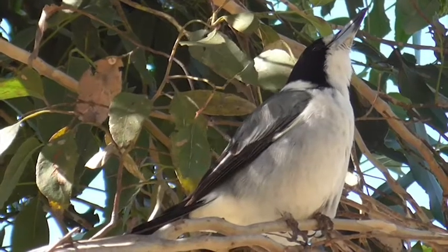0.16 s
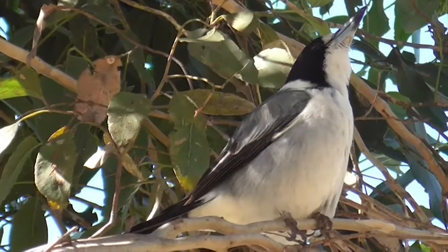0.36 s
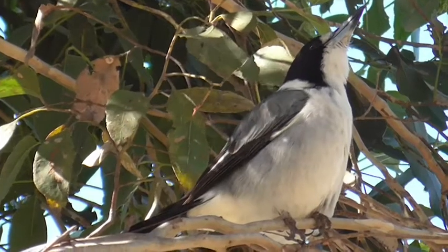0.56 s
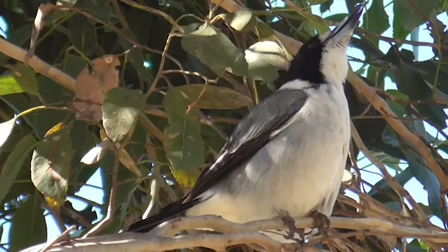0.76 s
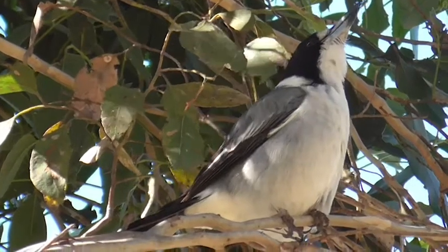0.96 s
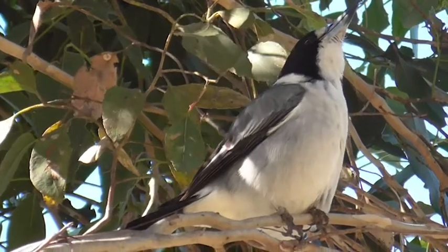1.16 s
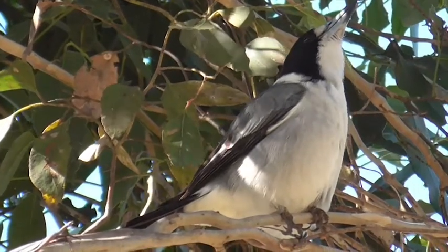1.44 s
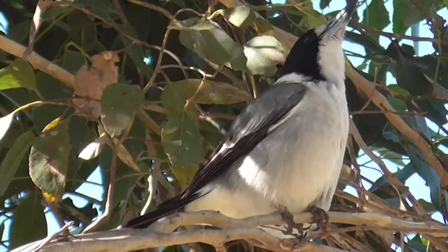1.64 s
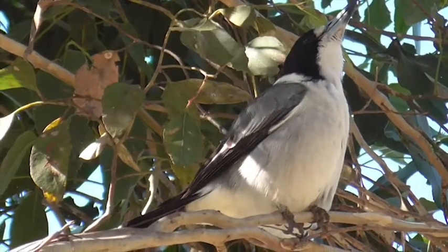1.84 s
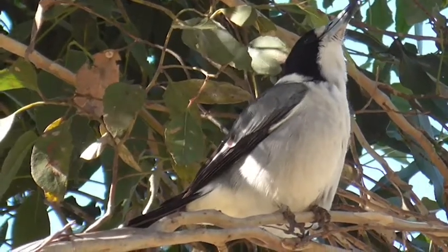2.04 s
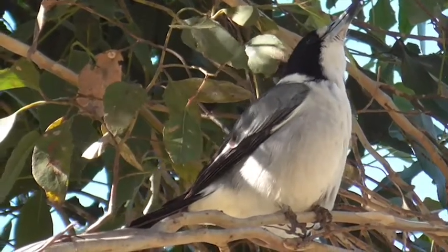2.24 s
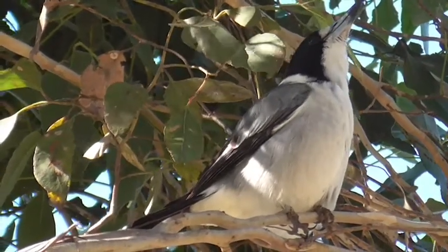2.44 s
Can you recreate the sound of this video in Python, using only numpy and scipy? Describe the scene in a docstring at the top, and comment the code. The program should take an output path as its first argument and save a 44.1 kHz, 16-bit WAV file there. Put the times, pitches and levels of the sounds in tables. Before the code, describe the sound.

A butcherbird sings softly among trees: a low falling whistle at 0 s, sharp rising chirps at 0.75 and 1.1 s, then short mellow whistles from 1.33 to 1.77, a downward glide at 2.05 and quick notes near 2.5. Distant raspy upslurs come at 0.4 and 2.15, thin chips between. A faint tick at 0.86, soft pop at 1.13, loud hollow knock at 1.8. Steady hiss, short echo.

```python
"""Among trees outdoors, a butcherbird sings softly: low whistled notes and two sharp rising chirps.
Its notes are gliding tones with overtones, their pitch and strength fluttering.
Birds farther off give raspy upslurs and thin chips made the same way, with scratchy swells of noise.
Knocks, one faint and one loud, mix decaying noise with ringing modes; a soft pop is a noise swell.
Coloured noise hisses steadily under it all, and the trees scatter a short echo around the calls."""
import sys
import numpy as np
from scipy import signal
from scipy.fft import rfft, irfft
from scipy.io import wavfile
from scipy.ndimage import uniform_filter1d

SR = 44100
rng = np.random.default_rng(int(sys.argv[2]) if len(sys.argv) > 2 else 0)


def file_out(sig):
    """Save sig as 16-bit WAV at sys.argv[1]."""
    # one column per channel
    cols = np.atleast_2d(sig).T
    # limit, then scale
    lim = np.clip(cols, -1, 1)
    pcm = np.round(lim * 32767).astype(np.int16)
    wavfile.write(sys.argv[1], SR, pcm)


N = 113778  # length in samples

# Colour of the outdoor hiss. Each row: frequency in Hz, relative density in dB per Hz.
HISS_COLOUR = [(15, -55), (28, -26), (50, -21.5), (80, -9), (148, -5.5), (275, -5), (434, -3.5),
               (510, -3.5), (650, -1.5), (829, 0), (1180, -3.5), (1540, -11.5), (1800, -18), (2130, -16.5),
               (2940, -12.5), (3270, -8), (4280, -5), (5760, -9.5), (8170, -6), (10700, -11.5),
               (12200, -12.5), (12900, -12.5), (13800, -15.5), (15600, -18.5)]
# Stereo tilt of the hiss. Each row: frequency in Hz, left minus right in dB.
HISS_BALANCE = [(100, 0.5), (900, -2.1), (1600, -3.5), (2500, -1), (4600, -0.5), (6000, 0.5), (8500, 2),
                (10500, 1.5), (12500, -3.5), (12900, 4), (13600, -2.5)]
# Stereo width of noise. Each row: frequency in Hz, left-right likeness (1 is identical).
LIKENESS = [(30, 0.49), (100, 1), (250, 0.94), (500, 0.65), (950, 0.48), (1900, 0.4), (3800, 0.37),
            (7500, 0.055), (15000, .05)]
# Echo among the trees. Each row: frequency in Hz, 60 dB decay time in seconds.
ECHO_T60 = [(200, 0.27), (1000, 0.48), (3000, 0.29), (6000, 1), (12000, .2)]

# Knocks. Each row: start in seconds, crack level in dB, thump level in dB, share of the full decay time.
KNOCKS = [(.862, -41, -70, .15), (1.789, -24, -36, 1)]
# Colours of crack, its tail and the thump. Each row: frequency in Hz, relative density in dB per Hz.
CRACK_COLOUR = [(470, -22), (800, -4), (2000, -17), (3100, 0), (4900, 3.5), (5900, -12), (6800, 2),
                (8200, -8), (10000, 0), (13900, -10), (15000, -25)]
CRACK_TAIL_COLOUR = [(470, -12), (1200, 2.5), (2000, -8), (3100, -0.5), (4800, 0), (7000, -3), (10000, -5),
                     (13000, -12), (15000, -31)]
THUMP_COLOUR = [(40, -35), (90, -30), (190, 4), (290, 1), (410, 4.5), (560, 4.5), (900, -3.5), (1500, -13),
                (4000, -40)]
# Hollow ringing in the thump. Each row: frequency in Hz, relative level in dB, full 60 dB decay in seconds.
KNOCK_MODES = [(100.6, -13, 0.4), (229.4, -5, 0.44), (295, -5, 0.63), (440, 4, 0.22), (748, -3.5, 0.41)]

# Soft pop under the second chirp. Each row: start in seconds, length in seconds, centre in Hz,
# width in Hz, level in dB before the swell and echo.
POPS = [(1.134, 0.0101, 600, 447, -35.5)]
# Scratchy noise among the calls. Each row: start in seconds, length in seconds, centre in Hz,
# width in Hz, level in dB before the swell and echo.
RASPS = [(0.35, .075, 9370, 2400, -46.5), (.925, .05, 11000, 1200, -52.5), (1.103, 0.031, 11400, 800, -50),
         (1.109, 0.072, 7400, 3200, -49.5), (1.1, 0.051, 2500, 3000, -46.5),
         (1.615, 0.056, 4300, 1500, -54), (2.147, 0.072, 8000, 970, -50.5),
         (2.433, 0.037, 1380, 250, -48.5), (2.6, 0.031, 1130, 220, -44.5), (.735, .025, 3400, 470, -41.5),
         (.935, 0.053, 5200, 4500, -50)]

# Thin distant chips. Each row: start in seconds, length in seconds, top pitch in Hz,
# top level in dB before the overtone levels.
CHIPS = [(.877, 0.0147, 3806, -41.5), (0.931, 0.0246, 4020, -45), (2.338, 0.017, 4600, -47)]
# Chip levels in dB, one per harmonic.
CHIP_OVERTONES_DB = [-2, -6, -10.5]

# Raspy upslurs, one curve per call. Each row: time in seconds, pitch in Hz,
# level in dB before the overtones and throat.
UPSLURS = [
    [(.365, 2040, -69), (.394, 2260, -47.5), (.408, 2480, -46), (.420, 2794, -43.5), (.436, 3010, -46.5),
     (.450, 3100, -50)],
    [(2.135, 2160, -61), (2.150, 2440, -47), (2.170, 2806, -46), (2.183, 3340, -41.5), (2.190, 3320, -66)],
]
# Upslur levels in dB, one list per call, one value per harmonic.
UPSLUR_OVERTONES_DB = [
    [-9, 0, -8, -6],
    [-3.5, 0, -5, -15],
]
# Throat colour of the upslurs. Each row: frequency in Hz, gain in dB.
UPSLUR_THROAT = [(2200, -4.5), (3300, 1.5), (4200, -2.5), (5500, 1.5), (6500, -8.5), (8000, 0), (9500, -8),
                 (11000, -12), (14000, -12)]
# Faint, wavering distant note. Each row: time in seconds, pitch in Hz, level in dB.
FAR_NOTE = [(.022, 2030, -60), (.05, 2113, -60), (.07, 2150, -67), (.1, 1845, -60)]

# Rising chirps, one curve per note. Each row: time in seconds, pitch in Hz, level in dB.
CHIRPS = [
    [(.714, 1946, -55), (.729, 1960, -46.5), (.738, 1987, -50), (.745, 2940, -39.5), (.751, 3115, -34.5),
     (.758, 3138, -28), (.765, 3103, -28), (.7685, 3094, -46), (.778, 2860, -43)],
    [(1.085, 1990, -61), (1.109, 1684, -46), (1.118, 1850, -55), (1.120, 2910, -41.5), (1.130, 2890, -36.5),
     (1.141, 3130, -36.5), (1.150, 3090, -41)],
]
# Chirp levels in dB, one list per chirp, one value per harmonic.
CHIRP_OVERTONES_DB = [
    [0, -16, -19, -19.5, -29],
    [0, -13, -17, -19, -32],
]
# Flutter depth of the fundamental's strength as a fraction, one per chirp.
CHIRP_ROUGHNESS = [0.055, 0.33]

# Low whistles, one curve per note. Each row: time in seconds, pitch in Hz,
# level in dB before the overtone levels.
WHISTLES = [
    [(0.0, 1377, -40), (0.012, 1376, -39.5), (0.038, 886, -42), (0.05, 894, -56), (0.064, 949, -55),
     (0.086, 893, -39), (0.106, 901, -45), (0.12, 844, -67)],
    [(1.33, 899, -48), (1.35, 937, -37.5), (1.362, 839, -35), (1.372, 810, -40), (1.402, 809, -39),
     (1.426, 748, -43.5), (1.435, 744, -49)],
    [(1.46, 833, -56), (1.466, 812, -43), (1.478, 823, -38.5), (1.514, 809, -39), (1.522, 823, -49),
     (1.54, 910, -52)],
    [(1.61, 1353, -59), (1.618, 1398, -41), (1.626, 1363, -36.5), (1.638, 1534, -40.5), (1.654, 1555, -38),
     (1.67, 1610, -62)],
    [(1.69, 844, -43), (1.698, 837, -41.5), (1.706, 901, -42), (1.728, 904, -36.5), (1.754, 859, -33.5),
     (1.766, 880, -46)],
    [(2.05, 1503, -56), (2.066, 1225, -36), (2.074, 1232, -43), (2.08, 1073, -32.5), (2.098, 922, -41.5),
     (2.11, 928.7, -34.5), (2.146, 932, -34.5), (2.19, 936, -58)],
    [(2.44, 1153, -56), (2.456, 1194, -44), (2.462, 1280, -44), (2.47, 1310, -58), (2.475, 1305, -61)],
    [(2.49, 1460, -37.5), (2.496, 1460, -45), (2.522, 1165, -39), (2.532, 890, -51), (2.538, 884, -34.5),
     (2.55, 871, -35.5), (2.56, 900, -53)],
]
# Whistle levels in dB, one per harmonic.
WHISTLE_OVERTONES_DB = [0.5, -31.5, -35.5, -49]


def amp(db):
    """Decibels to gain."""
    return 10 ** (np.asarray(db) / 20)


def unit(x):
    """Scales to rms 1."""
    return x / np.sqrt(np.mean(x ** 2) + 1e-20)


def read(points, hz):
    """Reads a table on a log-frequency axis."""
    f, value = np.transpose(points)
    return np.interp(np.log(hz + 1), np.log(f + 1), value)


def add(mix, s, sound):
    """Mixes a sound in at time s in seconds."""
    part = mix[..., max(round(s * SR), 0):][..., :sound.shape[-1]]
    part += sound[..., :part.shape[-1]]


def band(size, centre_hz, width_hz):
    """Noise in a bell-shaped band; centred on zero it is a slow wander."""
    hz = np.fft.rfftfreq(SR, 1 / SR)
    bell = np.exp(-2 * ((hz - centre_hz) / width_hz) ** 2)
    noise = irfft(rfft(rng.standard_normal(SR)) * bell)
    return unit(noise)[:size]


def pair(colour):
    """Coloured stereo noise: the right side shares part of the left, by frequency."""
    hz = np.fft.rfftfreq(N, 1 / SR)
    left, other = rfft(rng.standard_normal((2, N)))
    same = np.clip(read(LIKENESS, hz), -1, 1)
    right = same * left + np.sqrt(1 - same ** 2) * other
    return unit(irfft(np.array([left, right]) * amp(read(colour, hz)), N))


def place(x, pan_db, echo_db, echo_s):
    """Direct sound plus scatter from leaves and trunks: sparse random taps, fading by frequency."""
    size = SR // 2
    taps = rng.standard_normal((2, size)) * (rng.random((2, size)) < 2500 / SR)  # 2500 taps a second
    hz, t, z = signal.stft(taps, SR, nperseg=256)
    decay = amp(-60 * t / read(ECHO_T60, hz)[:, None])
    onset = np.minimum(t / 0.0058, 1)
    early = 1 + 2 * np.exp(-t / echo_s)  # stronger first scatter
    tail = signal.istft(z * decay * onset * early, SR, nperseg=256)[1]
    wet = signal.fftconvolve(x[None], unit(tail) / np.sqrt(tail.shape[1]), axes=1)[:, :N]
    direct = x * amp([[pan_db / 2], [-pan_db / 2]])  # positive pan leans left
    return direct + amp(echo_db) * wet


def puff(s, length, hz, width, db):
    """A short swell of band noise."""
    size = round(length * SR)
    return s, amp(db) * np.hanning(size) * band(size, hz, width)


def note(curve, overtones_db, jitter, shimmer, flutter_hz, throat=None):
    """The syrinx: a tone with overtones whose pitch and strength flutter, optionally throat-coloured."""
    overtone_shimmer = 0.35  # flutter depth above the fundamental
    s, hz, db = np.transpose(curve)
    t = np.arange(s[0], s[-1], 1 / SR)
    pitch = np.interp(t, s, hz) * (1 + jitter * band(len(t), 0, flutter_hz))
    phase = 2 * np.pi * np.cumsum(pitch) / SR
    ends = np.clip(np.minimum(t - t[0], t[-1] - t) / 0.0018, 0, 1)  # 1.8 ms fades
    tone = 0
    for k, level in enumerate(overtones_db, 1):
        colour = read(throat, k * pitch) if throat else 0
        depth = shimmer if k == 1 else overtone_shimmer
        flutter = 1 + depth * band(len(t), 0, flutter_hz)
        tone = tone + amp(level + colour) * np.sin(k * phase) * flutter
    # root two lets the levels count as rms
    return s[0], np.sqrt(2) * ends * amp(np.interp(t, s, db)) * tone


def hiss():
    """Steady outdoor wash of coloured noise, with faint drifting patches in time and frequency."""
    level_db, patchy_db = -43, 0.62
    hz, t, z = signal.stft(pair(HISS_COLOUR), SR, nperseg=1024, noverlap=768)
    grain = rng.standard_normal((len(t), len(hz)))
    smooth_in_time = uniform_filter1d(grain, 14, 0)
    patches = unit(uniform_filter1d(smooth_in_time, 16, 1)).T
    tilt = read(HISS_BALANCE, hz)[:, None] / 2
    z = z * amp(patchy_db * patches + np.array([tilt, -tilt]))
    wash = signal.istft(z, SR, nperseg=1024, noverlap=768)[1][:, :N]
    return amp(level_db) * unit(wash)


def knocks():
    """A bright crack with a scattered tail over a dull, hollow thump; a rustle leads into the loudest."""
    crack_t60_s, tail_t60_s, thump_t60_s = 0.029, 0.28, 0.49  # before each knock's share
    crack_rise_s, thump_rise_s = 0.001, 0.0064
    rustle_lead_s = 0.02
    out, t = np.zeros((2, N)), np.arange(N) / SR
    for s, crack_db, thump_db, ring in KNOCKS:
        age = t / ring  # a small share of the decay time ages the knock faster
        snap = amp(-60 * age / crack_t60_s) * pair(CRACK_COLOUR)
        tail = amp(-9.5 - 60 * age / tail_t60_s) * pair(CRACK_TAIL_COLOUR)
        crack = snap + tail * amp([[-1], [1]])  # the tail leans right
        body = sum(amp(db - 60 * age / t60) * np.sin(2 * np.pi * hz * t) for hz, db, t60 in KNOCK_MODES)
        thump = amp(-0.5 - 60 * age / thump_t60_s) * pair(THUMP_COLOUR) + amp(-1.5) * body
        crack = np.minimum(t / crack_rise_s, 1) * amp(crack_db) * crack
        thump = np.minimum(t / thump_rise_s, 1) * amp(thump_db) * thump
        add(out, s, crack + thump)
    rustle = np.zeros(N)
    start = KNOCKS[-1][0] - rustle_lead_s
    add(rustle, *puff(start, 2 * rustle_lead_s, hz=4140, width=5700, db=-42.5))
    return out + place(rustle, pan_db=-9, echo_db=-8, echo_s=0.02)


def pops():
    """A brief dull pop: a short swell of low band noise."""
    out = np.zeros(N)
    for row in POPS:
        add(out, *puff(*row))
    return place(out, pan_db=-4, echo_db=-7, echo_s=0.02)


def rasps():
    """The scratchy edge of the calls: swells of band noise, blurred by echo."""
    out = np.zeros(N)
    for row in RASPS:
        add(out, *puff(*row))
    return place(out, pan_db=0, echo_db=2, echo_s=0.039)


def chips():
    """Short calls from far off, pitch and level arching up and back down."""
    pitch_arch = 0.1204  # how far the ends sit below the top pitch, as a fraction
    out = np.zeros(N)
    u = np.linspace(0, 1, 9)
    below_top = 1 - np.sin(np.pi * u)
    for s, length, hz, db in CHIPS:
        curve = np.transpose([s + length * u, hz * (1 - pitch_arch * below_top), db - 10 * below_top])
        add(out, *note(curve, CHIP_OVERTONES_DB, jitter=0.011, shimmer=0.44, flutter_hz=500))
    return place(out, pan_db=0, echo_db=-2.5, echo_s=0.05)


def upslurs():
    """Rough rising calls with strong overtones and one faint note, blurred by the trees."""
    out = np.zeros(N)
    for curve, overtones_db in zip(UPSLURS, UPSLUR_OVERTONES_DB):
        call = note(curve, overtones_db, jitter=0.01, shimmer=0.35, flutter_hz=700, throat=UPSLUR_THROAT)
        add(out, *call)
    add(out, *note(FAR_NOTE, [0], jitter=0.032, shimmer=0.32, flutter_hz=300))
    return place(out, pan_db=-7, echo_db=2, echo_s=0.06)


def chirps():
    """A quiet low start that leaps up into a bright, louder note."""
    out = np.zeros(N)
    for curve, overtones_db, roughness in zip(CHIRPS, CHIRP_OVERTONES_DB, CHIRP_ROUGHNESS):
        add(out, *note(curve, overtones_db, jitter=0.011, shimmer=roughness, flutter_hz=503))
    return place(out, pan_db=0.8, echo_db=-13, echo_s=0.0093)


def whistles():
    """Soft, almost pure low notes; on the glides they beat against one strong nearby reflection."""
    bounce_s, bounce_db = 0.011, -10
    out = np.zeros(N)
    for curve in WHISTLES:
        s, sound = note(curve, WHISTLE_OVERTONES_DB, jitter=0.011, shimmer=0.13, flutter_hz=200)
        add(out, s, sound)
        add(out, s + bounce_s, amp(bounce_db) * sound)
    return place(out, pan_db=1.5, echo_db=-12.5, echo_s=0.028)


def scene():
    """All the sources together, from the background to the singer."""
    background = hiss() + knocks() + pops()
    far_birds = rasps() + chips() + upslurs()
    return background + far_birds + chirps() + whistles()


def record(dry):
    """The recorder's band limit: a steep low-pass at 15.8 kHz."""
    lowpass = signal.firwin(801, 15800, window=("kaiser", 9), fs=SR)
    return signal.oaconvolve(dry, lowpass[None], "same")


dry = scene()
out = record(dry)
file_out(out)
```